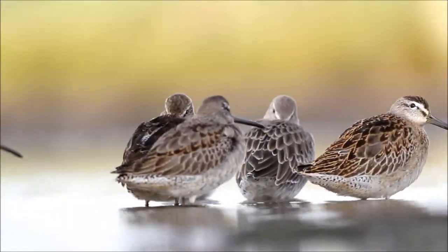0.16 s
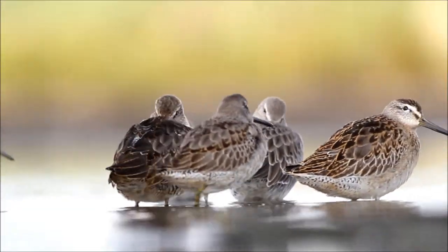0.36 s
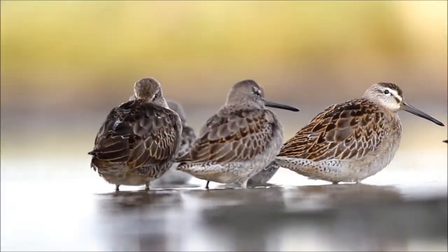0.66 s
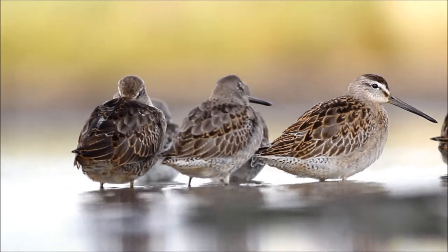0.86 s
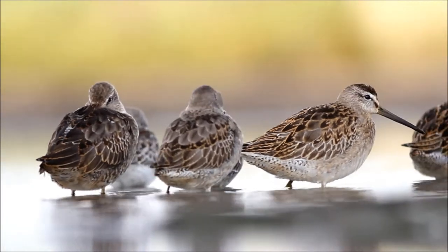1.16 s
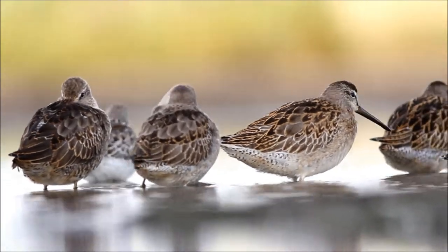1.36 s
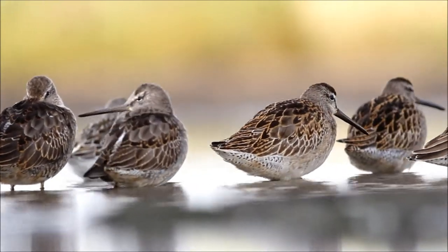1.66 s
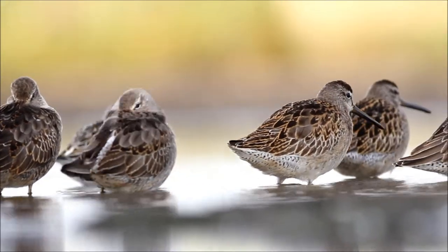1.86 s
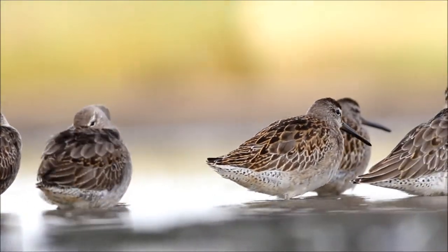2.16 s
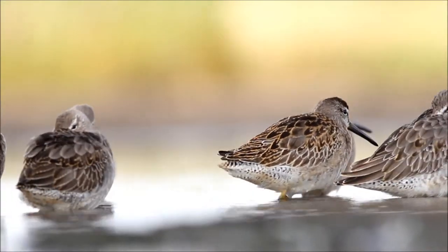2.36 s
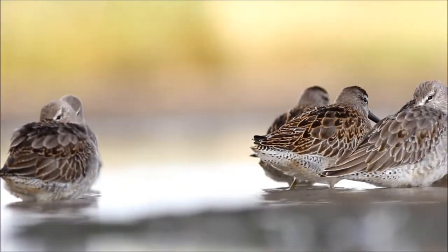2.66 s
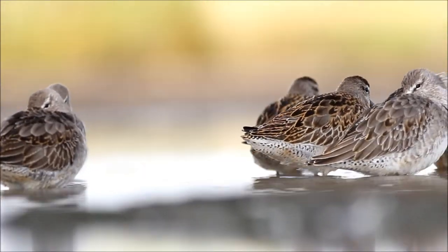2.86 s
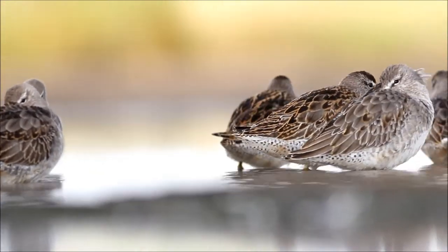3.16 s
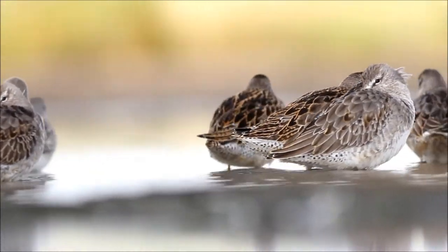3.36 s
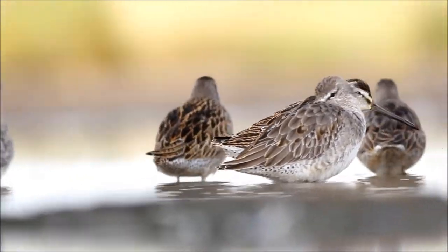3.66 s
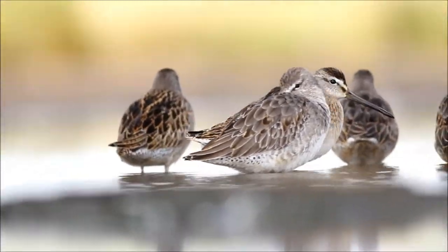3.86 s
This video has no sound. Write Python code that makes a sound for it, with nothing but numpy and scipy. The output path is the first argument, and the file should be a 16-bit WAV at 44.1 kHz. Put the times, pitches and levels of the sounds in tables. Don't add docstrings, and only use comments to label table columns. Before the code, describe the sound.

Low wind thumping over a faint watery wash, two short wader calls and one sharp bill click

```python
import sys
import numpy as np
from scipy import signal
from scipy.fft import rfft, irfft
from scipy.io import wavfile
from scipy.ndimage import uniform_filter1d

SR = 44100
rng = np.random.default_rng(int(sys.argv[2]) if len(sys.argv) > 2 else 0)


def makeup_ratio(level_db):
    decades = np.asarray(level_db, float) / 20
    return 10 ** decades


def unload_audio(sound):
    columns = np.transpose(np.atleast_2d(sound))
    steps = np.round(np.clip(columns, -1, 1) * 32767)
    wavfile.write(sys.argv[1], SR, steps.astype(np.int16))


N = 176400


def evened(x):
    return x / np.sqrt(np.mean(x ** 2) + 1e-20)


def read(points, hz):
    f, value = np.transpose(points)
    return np.interp(np.log(hz + 1), np.log(f + 1), value)


def over_time(points, t):
    return np.interp(t, *np.transpose(points))


def add(mix, s, sound):
    part = mix[round(s * SR):][:len(sound)]
    part += sound[:len(part)]


def slow(rate_hz):
    pole = np.exp(-2 * np.pi * rate_hz / SR)
    return evened(signal.lfilter([1], [1, -pole], rng.standard_normal(N)))


def coloured(points, count):
    gain = makeup_ratio(read(points, np.fft.rfftfreq(count, 1 / SR)))
    return evened(irfft(rfft(rng.standard_normal(count)) * gain, count))


# (frequency [Hz], density [dB per Hz])
WASH_COLOUR = [(25, -7), (85, -4), (400, -9.5), (1120, -18.5), (1500, -28), (3400, -39.5), (9000, -46.5),
               (16000, -57)]
# (centre [Hz], width [Hz], height [dB])
WASH_HUMPS = [(992, 55, 2.5), (2255, 57, 4), (2740, 260, 2), (4500, 360, 2.5)]
# (time [s], level [dB])
WASH_SWELL = [(0, -0.5), (.3, -1), (.7, 0), (.85, 1.5), (1.2, 2), (1.4, 0), (2.0, -0.5), (2.6, -0.5),
              (3.05, -1), (4, 0)]
WASH_DB, PATCH_DB, EDGE_HZ = -38, 1.0, 15780
SWELL_HZ, SWELL_OCTAVES = 650, 0.58


def wash():
    hop = 256
    frames, hz = N // hop + 5, np.fft.rfftfreq(1024, 1 / SR)
    real, imaginary, patches = rng.standard_normal((frames, 513, 3)).T
    patches = uniform_filter1d(patches, size=10, axis=0)
    patches = evened(uniform_filter1d(patches, size=12, axis=1))
    colour = read(WASH_COLOUR, hz)
    for centre, width, db in WASH_HUMPS:
        colour = colour + db * np.exp(-.5 * ((hz - centre) / width) ** 2)
    middle = np.exp(-.5 * (np.log2((hz + 1) / SWELL_HZ) / SWELL_OCTAVES) ** 2)
    swell_db = np.outer(middle, over_time(WASH_SWELL, np.arange(frames) * hop / SR))
    gain = makeup_ratio(colour[:, None] + PATCH_DB * patches + swell_db) * (hz < EDGE_HZ)[:, None]
    noise = signal.istft((real + 1j * imaginary) * gain, nperseg=1024, noverlap=1024 - hop)[1]
    return makeup_ratio(WASH_DB) * evened(noise[:N])


# (frequency [Hz], level [dB])
MOTOR_LINES = [(240, -47.5), (300, -52), (320, -50), (401, -48.5), (490, -59), (560, -54.5), (802, -60),
               (900, -62)]
# (time [s], level [dB])
MOTOR_SWELL = [(0, -17), (.5, -15), (.65, 3), (1.1, -1.5), (1.3, -12), (1.85, -6.5), (2.0, -0.5),
               (2.85, -0.5), (3.05, -16), (4, -18)]


def hum():
    lines = np.zeros(N)
    for hz, db in MOTOR_LINES:
        level = makeup_ratio(db + 3.1 * slow(1.7))
        pitch = hz + 2.4 * slow(3.85)
        lines += level * np.sin(2 * np.pi * np.cumsum(pitch) / SR)
    return np.sqrt(2) * lines * makeup_ratio(over_time(MOTOR_SWELL, np.arange(N) / SR))


def glide(length, from_hz, to_hz, db):
    u = np.arange(0, length, 1 / SR) / length
    chance = rng.standard_normal((2, 2048))
    for _ in range(2):
        chance = uniform_filter1d(chance, size=90, axis=1)
    shake, flutter = (evened(v)[:len(u)] for v in chance)
    hz = (from_hz + (to_hz - from_hz) * u) * (1 + .006 * shake)
    level = np.sqrt(2) * makeup_ratio(db + 1.6 * flutter) * np.sin(np.pi * u) ** 0.63
    return level * np.sin(2 * np.pi * np.cumsum(hz) / SR)


# (start [s], length [s], start pitch [Hz], end pitch [Hz], level [dB])
GLIDES = [(.032, .012, 4000, 4500, -64), (.048, 0.013, 3820, 4020, -59.5), (.76, 0.028, 3190, 4420, -57.5),
          (1.898, .03, 7700, 7200, -68), (2.873, .032, 7560, 7150, -64), (3.137, 0.019, 3140, 4120, -62),
          (3.149, 0.017, 2320, 3100, -57), (3.371, .02, 2570, 3700, -60), (3.376, 0.017, 4200, 5370, -61),
          (3.844, .017, 4950, 5300, -61), (3.856, 0.014, 4400, 5700, -57),
          (3.859, 0.025, 3160, 4800, -51.5), (3.86, .009, 5700, 6300, -65), (3.866, 0.012, 4500, 5500, -58),
          (3.87, 0.011, 2880, 3240, -60.5), (3.883, .01, 4600, 4300, -62), (3.887, 0.019, 3250, 4280, -62),
          (3.887, .028, 2150, 3350, -60)]


def bubbles_and_peeps():
    out = np.zeros(N)
    for start, *shape in GLIDES:
        add(out, start, glide(*shape))
    return out


RASP_AT, RASP_S = 1.83, 0.013


def call(curve, throat, jitter, count):
    s, hz, db = np.transpose(curve)
    t = np.arange(s[0], s[-1], 1 / SR)
    shake = evened(uniform_filter1d(rng.standard_normal(N)[:len(t)], size=30))
    pitch = uniform_filter1d(np.interp(t, s, hz), size=150) * (1 + jitter * shake)
    turns = np.cumsum(pitch) / SR
    choke_db = -12.5 * np.exp(-.5 * ((t - RASP_AT) / RASP_S) ** 2)
    voice = np.zeros(len(t))
    for k in range(1, count + 1):
        gain_db = read(throat, k * pitch) + (k > 1) * choke_db
        voice += makeup_ratio(gain_db) * np.sin(2 * np.pi * k * turns)
    ends = np.clip(np.minimum(t - s[0], s[-1] - t) / 0.0046, 0, 1)
    level = np.sqrt(2) * makeup_ratio(uniform_filter1d(np.interp(t, s, db), size=100))
    return s[0], level * ends * voice


# (time [s], pitch [Hz], level [dB])
ARCH = [(2.025, 1054, -58), (2.04, 1390, -57), (2.055, 1373, -56), (2.072, 1190, -62)]
WARBLE = [(1.0, 5500, -69), (1.015, 5880, -67), (1.033, 5584, -62), (1.06, 5950, -67)]
FALL = [(1.327, 5780, -71), (1.335, 5850, -64), (1.343, 5030, -65), (1.354, 5000, -62), (1.366, 4250, -64)]


def far_birds():
    out = np.zeros(N)
    add(out, *call(ARCH, [(1300, 4), (2700, 4), (5400, -21)], jitter=.07, count=4))
    for curve in (WARBLE, FALL):
        add(out, *call(curve, [(1, 0), (2, 0)], jitter=.004, count=1))
    return out


# (frequency [Hz], density [dB per Hz])
RASP_COLOUR = [(1300, -7), (2500, 9), (4100, -7), (5000, 4), (6800, -8), (8000, -23), (10200, -19),
               (16000, -36)]


def rasp():
    swell = np.exp(-.5 * abs((np.arange(N) / SR - RASP_AT) / RASP_S) ** 3)
    return makeup_ratio(-42) * coloured(RASP_COLOUR, N) * swell


# (time [s], pitch [Hz], level [dB])
HOARSE = [(1.807, 1990, -30), (1.811, 1765, -40), (1.822, 1726, -39), (1.832, 1916, -36.5),
          (1.843, 1720, -41.5), (1.855, 1380, -49), (1.863, 1200, -62)]
CLEAR = [(3.683, 1520, -56), (3.688, 1836, -47), (3.694, 1820, -43), (3.703, 2180, -37), (3.711, 2264, -34),
         (3.72, 2190, -36), (3.732, 1796, -46), (3.744, 1270, -59)]
SECOND = [(3.695, 2390, -70), (3.703, 2870, -53), (3.714, 2980, -50), (3.728, 2980, -55),
          (3.742, 2500, -54)]
# (frequency [Hz], gain [dB])
HOARSE_THROAT = [(2000, 0.5), (2800, 2.5), (3700, -11), (4600, -16), (5300, -8), (7000, -28), (9000, -36)]
CLEAR_THROAT = [(2300, 3.5), (3200, -3), (4400, -22.5), (6700, -17.5), (8500, -46)]


def near_birds():
    out = rasp()
    add(out, *call(HOARSE, HOARSE_THROAT, jitter=0.023, count=6))
    add(out, *call(CLEAR, CLEAR_THROAT, jitter=0.0034, count=4))
    add(out, *call(SECOND, [(3000, 2), (6000, -10)], jitter=0.0052, count=2))
    return out


def click(db, crack, modes, crack_s, bounce_db, ring_db):
    t = np.arange(2048) / SR
    ring = np.zeros(len(t))
    for k, (hz, mode_db, t60) in enumerate(modes):
        ring += (-1) ** k * makeup_ratio(mode_db - 60 * t / t60) * np.sin(2 * np.pi * hz * t)
    ring *= np.minimum(t / 0.00074, 1)
    burst = 3 * (t == 0) + rng.standard_normal(len(t)) * np.exp(-t / crack_s)
    gain = makeup_ratio(read(crack, np.fft.rfftfreq(len(t), 1 / SR)))
    tap = irfft(rfft(np.roll(burst, 30)) * gain, len(t)) * np.minimum(t * SR / 30, 1)
    tap = 1.33 * tap / abs(tap).max()
    bounce = uniform_filter1d(np.interp(t - .0017, t, tap, left=0), size=9)
    sound = makeup_ratio(ring_db) * ring + tap + makeup_ratio(bounce_db) * bounce
    return makeup_ratio(db) * sound / abs(sound).max()


# (time [s], level [dB], ring [dB])
SNAP = (3.2811, -11.5, 1)
# (time [s], level [dB], ring [dB])
TICKS = [
    (3.581, -41, 1),
    (3.819, -39, -14),
]
# (frequency [Hz], level [dB], t60 [s])
SNAP_MODES = [(826, -9.5, 0.019), (1124, -1, 0.021), (1770, -18, 0.019)]
TICK_MODES = [(13140, 1, .012)]
# (frequency [Hz], density [dB per Hz])
SNAP_CRACK = [(600, -6), (2300, 0), (2800, -7), (5600, 0), (6200, -36), (7300, -26), (8100, -8),
              (16000, -27)]
TICK_CRACK = [(6000, -25), (9000, -10), (13000, 2), (16000, -8)]


def bill():
    out = np.zeros(N)
    s, db, ring_db = SNAP
    add(out, s, click(db, SNAP_CRACK, SNAP_MODES, crack_s=0.00036, bounce_db=-6.0, ring_db=ring_db))
    for s, db, ring_db in TICKS:
        add(out, s, click(db, TICK_CRACK, TICK_MODES, crack_s=0.0005, bounce_db=-22.0, ring_db=ring_db))
    return out


def eddy(hz, phase):
    u = np.arange(-1323, 1323) / SR * hz
    swing = np.exp(-.5 * (u / 0.33) ** 2)
    wave = swing * np.cos(2 * np.pi * (u + phase))
    return wave - swing * wave.sum() / swing.sum()


LUMP_HZ, SIZE_SPREAD = 81.7, 0.13
# (time [s], peak level
# [dB], pitch [Hz])
BUFFETS = [(0.056, -6.5, 213), (0.287, -7.5, 147), (0.45, -14.5, 127), (0.814, -13, 158), (1.211, -14, 133),
           (1.474, -16, 120), (1.687, -6.5, 118), (1.925, -14, 138), (1.946, -14, 131), (2.207, -11, 165),
           (2.233, -13.5, 108), (2.264, -11, 180), (2.288, -5, 106), (2.321, -22, 142), (2.369, -13.5, 143),
           (2.403, -9.5, 101), (2.601, -8, 134), (3.203, -14.5, 156), (3.316, -18, 108), (3.402, -10, 102),
           (3.511, -11, 121), (3.606, -8, 98), (3.634, -7.5, 142), (3.658, -12, 186), (3.674, -10.5, 131),
           (3.857, -12, 163), (3.885, -1.5, 118), (3.929, -8.5, 190), (3.948, -6.5, 190),
           (3.978, -9.5, 127), (3.999, -19, 120)]
# (time [s], peak level [dB], pitch [Hz])
FLAPS = [(.054, -16.5, 440), (.28, -19, 370), (.273, -17, 272), (.295, -20.5, 440), (2.276, -11, 284),
         (2.598, -17, 287), (3.284, -18.5, 260), (.057, -26, 690), (.286, -25.5, 650), (.814, -25, 300),
         (.277, -23, 600), (.29, -17, 270), (1.68, -19, 270), (1.695, -19, 260), (.75, -24, 270),
         (1.9, -26, 280), (2.47, -25, 290), (2.756, -31, 280), (3.631, -20, 284), (3.883, -15.5, 346),
         (3.929, -22, 287), (3.946, -16, 290), (3.965, -17, 423)]
# (time [s], peak level [dB])
LUMPS = [(.03, -25), (0.07, -36), (0.264, -15), (.316, -18.5), (0.387, -17.5), (.564, -26), (.73, -24),
         (.758, -15.5), (0.855, -22), (0.988, -19.5), (1.076, -22.5), (1.122, -21), (1.255, -21),
         (1.581, -16), (1.658, -15), (1.704, -20), (1.794, -15.5), (1.827, -20.5), (2.094, -16.5),
         (2.656, -20), (2.754, -18.5), (2.924, -26), (3.103, -15.5), (3.145, -20.5), (3.252, -18.5),
         (3.291, -17.5), (3.433, -17.5), (3.47, -13.5), (3.564, -20)]


def marked_eddies():
    out, marks = np.zeros(N), np.zeros(N)
    rows = [*BUFFETS, *FLAPS, *((*row, LUMP_HZ) for row in LUMPS)]
    first_lump = len(BUFFETS) + len(FLAPS)
    for k, (s, db, hz) in enumerate(rows):
        phase, odd = rng.random(2)
        if k >= first_lump:
            hz = hz * (1 + SIZE_SPREAD * (2 * odd - 1))
        flip = .5 * (odd < .5)
        add(out, max(s - .03, 0), makeup_ratio(db) * eddy(hz, phase / 4 - flip))
        add(marks, s, [makeup_ratio(2 * db)])
    return out, marks


EDDIES_PER_S, EDDY_SPREAD_DB, EDDY_LOW_HZ, EDDY_TOP_HZ = 160, 2.0, 60.6, 233


def small_eddies():
    size = makeup_ratio(EDDY_SPREAD_DB * np.minimum(rng.exponential(1, N), 4))
    size = size * (rng.random(N) < EDDIES_PER_S / SR)
    kind = rng.integers(0, 24, N)
    out = np.zeros(N)
    for k, hz in enumerate(np.geomspace(EDDY_LOW_HZ, EDDY_TOP_HZ, 24)):
        swing = eddy(hz, rng.random()) * (LUMP_HZ / hz) ** 0.32
        out += signal.oaconvolve(size * (kind == k), swing, "same")
    return evened(out)


CALM_DB, WAKE_DB, WAKE_RISE_S, WAKE_FALL_S = -36.5, -15, .012, .028
RUMBLE_HZ, RUMBLE_DB, MIC_HZ = 54, -12, 56


def wind():
    strikes, marks = marked_eddies()
    t = np.arange(-SR // 4, SR // 4) / SR
    wake_shape = np.exp(-np.maximum(t / WAKE_FALL_S, -t / WAKE_RISE_S))
    wake = signal.oaconvolve(marks, wake_shape, "same")
    gust = np.sqrt(makeup_ratio(2 * CALM_DB) + makeup_ratio(2 * WAKE_DB) * abs(wake))
    thumps = strikes + small_eddies() * gust
    low = signal.butter(2, [RUMBLE_HZ * .62, RUMBLE_HZ], "band", fs=SR, output="sos")
    rumble = evened(signal.sosfilt(low, rng.standard_normal(N)))
    mic = signal.butter(2, MIC_HZ, "high", fs=SR)
    return signal.lfilter(*mic, thumps) + makeup_ratio(RUMBLE_DB) * rumble * gust


def scene():
    mix = wind() + wash() + hum() + near_birds() + far_birds() + bubbles_and_peeps() + bill()
    return mix[None]


def top_cut(x):
    return signal.sosfilt(signal.butter(12, 16530, fs=SR, output="sos"), x)


def record(dry):
    low_pass = signal.firwin(255, 16250, fs=SR)
    mix = signal.oaconvolve(dry, low_pass[None], "same")
    return top_cut(mix)


dry = scene()
out = record(dry)
unload_audio(out)
```